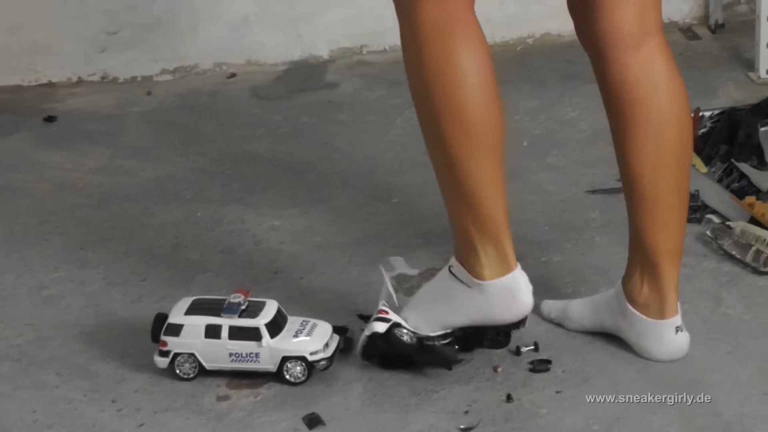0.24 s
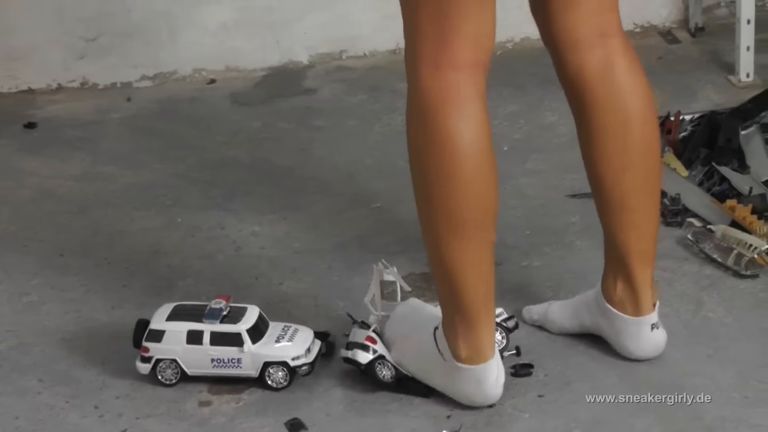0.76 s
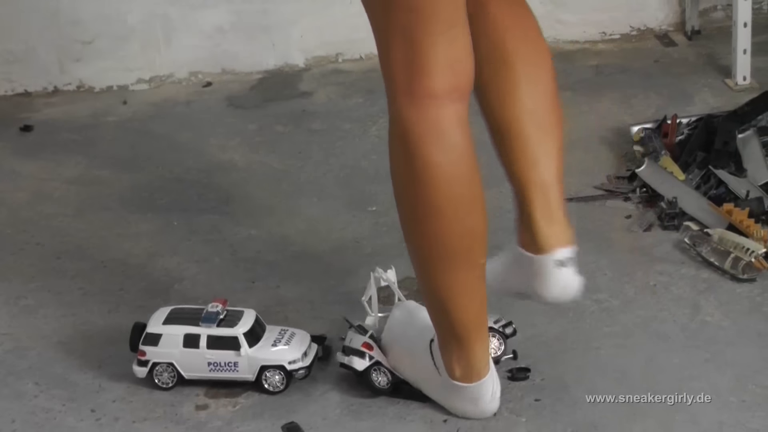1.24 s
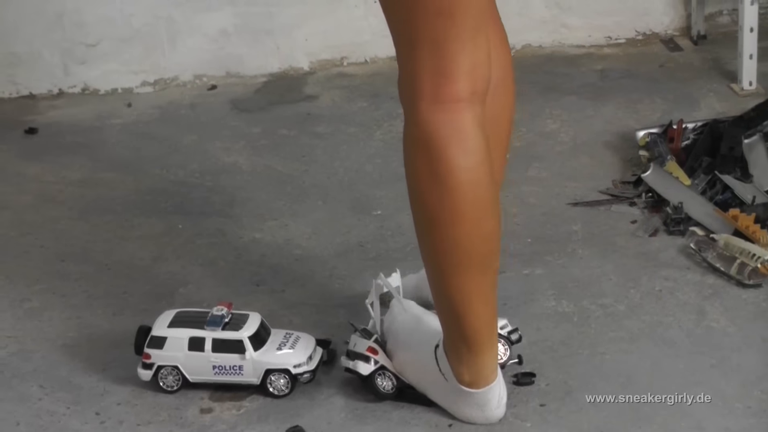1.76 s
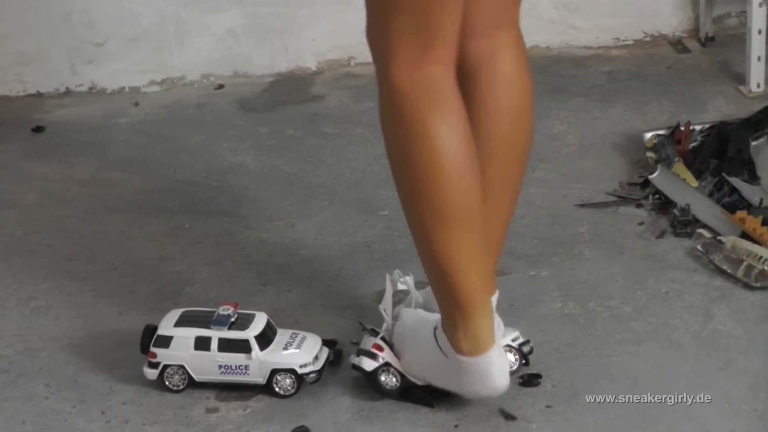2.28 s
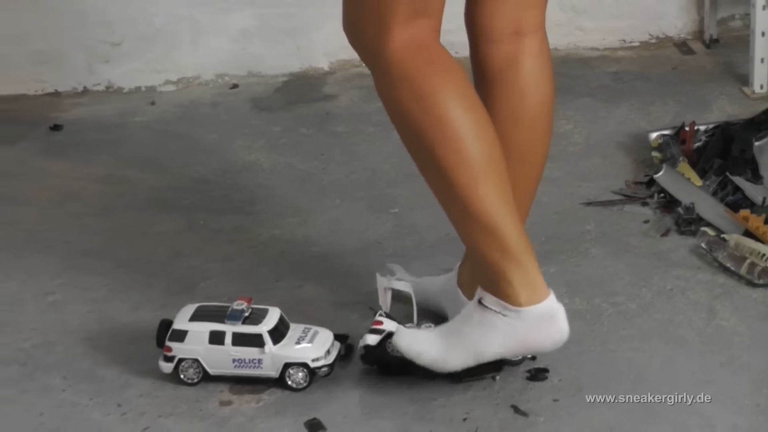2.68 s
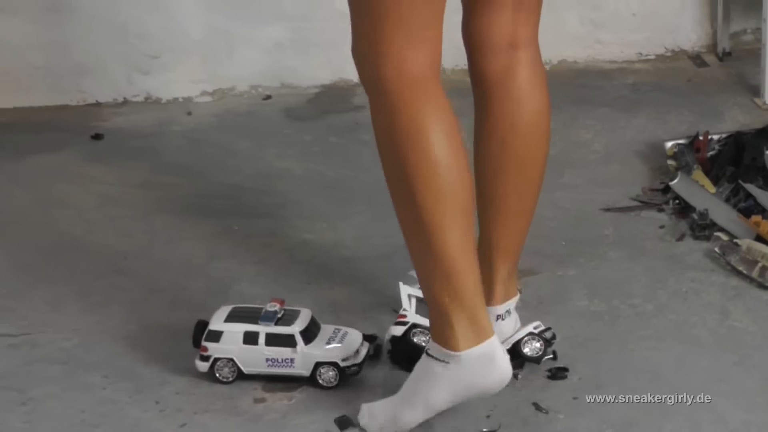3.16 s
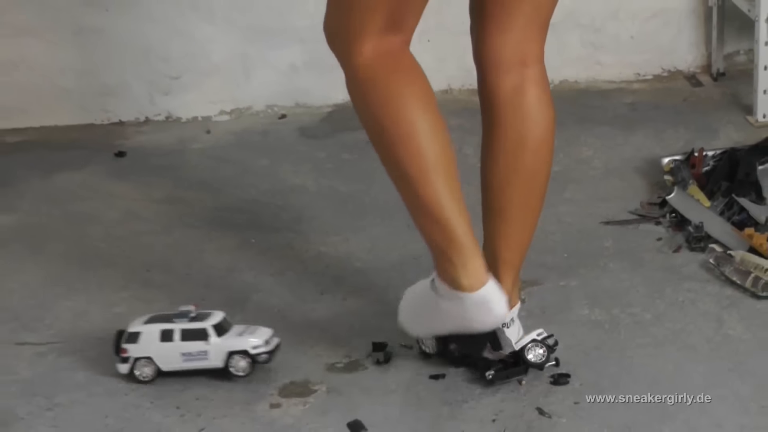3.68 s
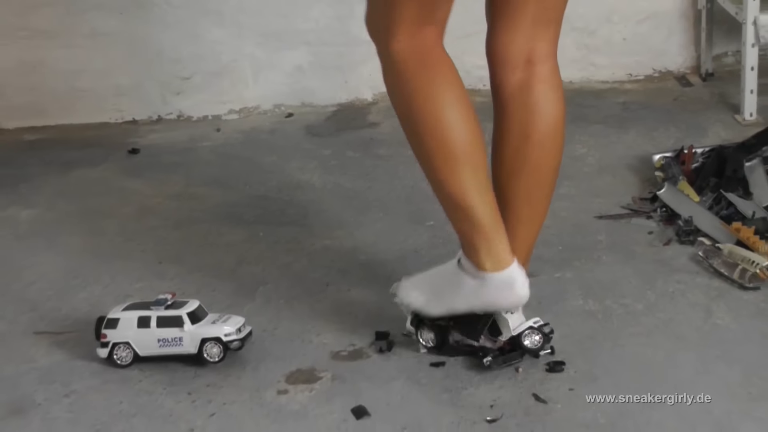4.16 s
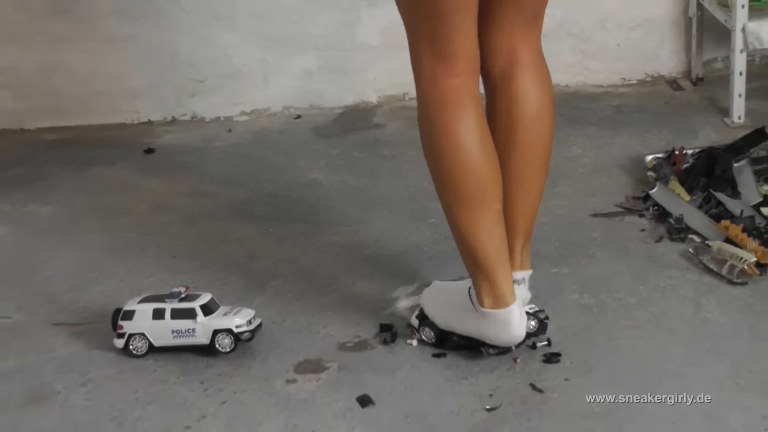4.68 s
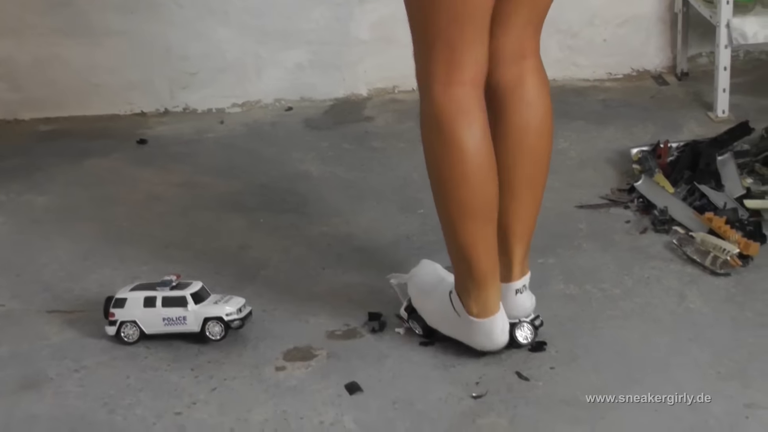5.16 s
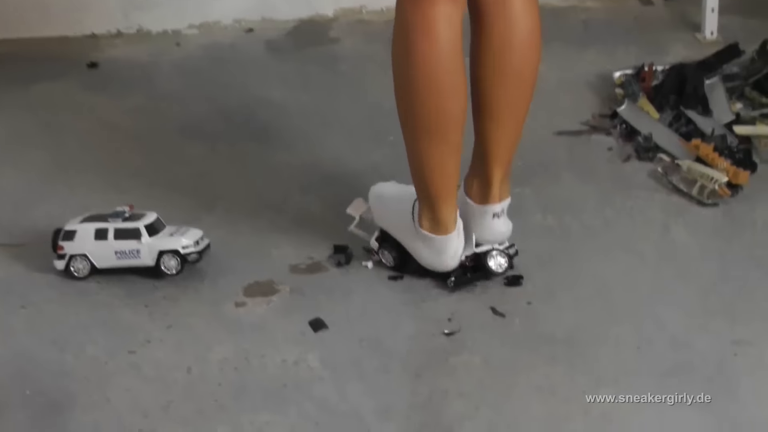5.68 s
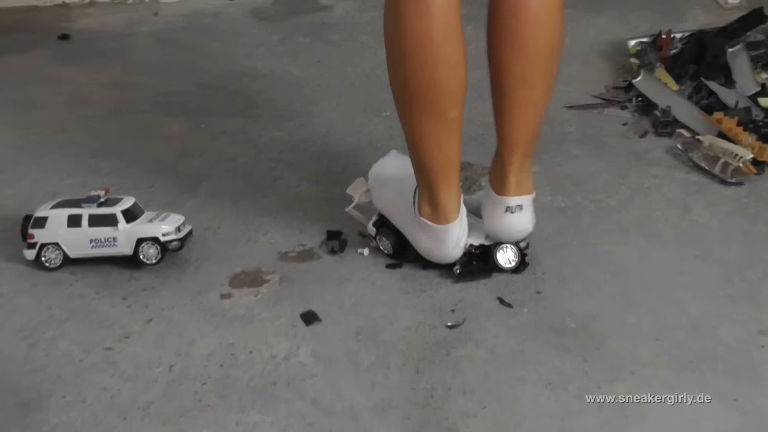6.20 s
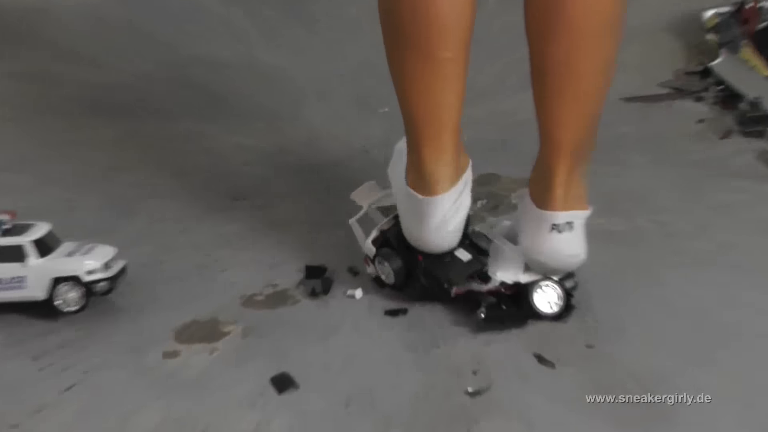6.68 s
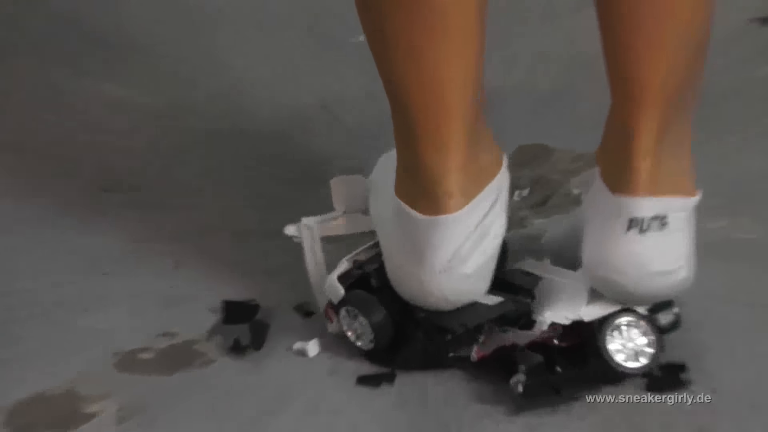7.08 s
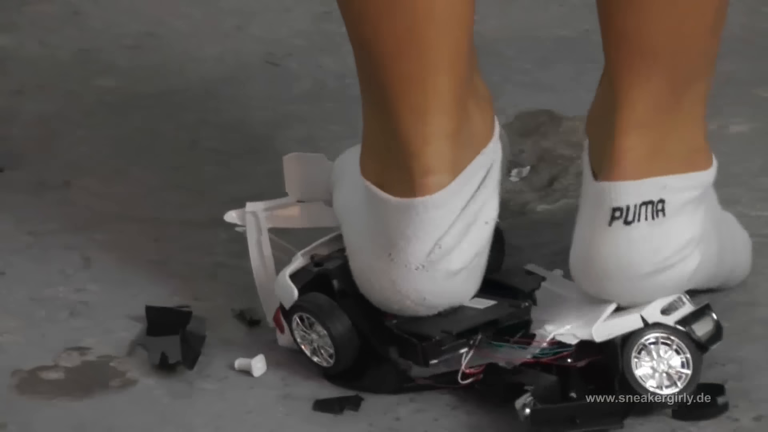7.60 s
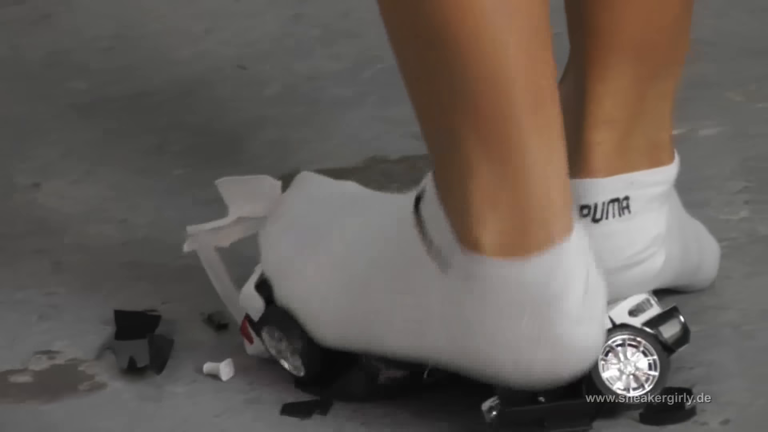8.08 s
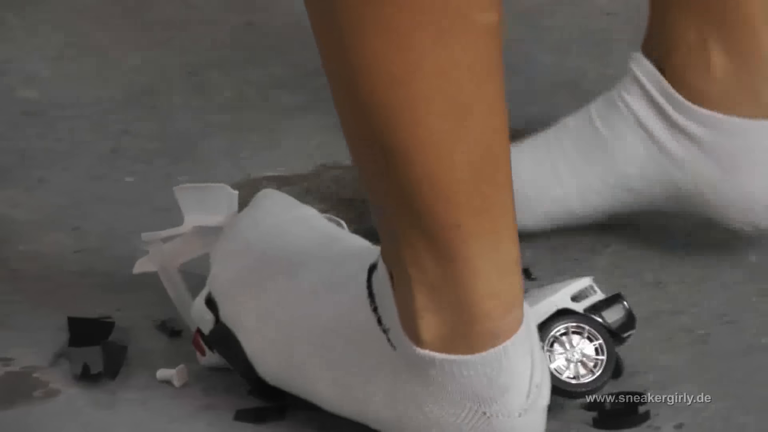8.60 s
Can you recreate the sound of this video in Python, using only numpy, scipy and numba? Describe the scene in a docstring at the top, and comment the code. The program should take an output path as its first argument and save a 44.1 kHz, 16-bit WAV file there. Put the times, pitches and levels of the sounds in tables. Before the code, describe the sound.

Dense brittle cracking and splintering of a plastic toy under socked feet, with short lulls, echoing off hard walls over a faint far hum.

```python
"""A hard plastic snap comes at once: feet in socks grind a plastic toy car on a bare concrete floor.
Bursts of noise ring as shell, panels and edges; splinters tick, small pieces crackle and slips make the shell creak.
A hard-walled room rings on after every snap and a machine hums far off, as wavering sines over soft noise.
Two close microphone ports pick it up, and the camera's gain control ducks when it is loud."""
import sys
import numpy as np
from scipy import signal
from scipy.fft import rfft, irfft, next_fast_len
from scipy.io import wavfile
from scipy.ndimage import uniform_filter1d, map_coordinates
from numba import njit

SR = 44100
rng = np.random.default_rng(int(sys.argv[2]) if len(sys.argv) > 2 else 0)


def put_to_file(sound):
    """Save the sound as 16-bit audio at rate SR, in the file named by the first command-line argument."""
    columns = np.atleast_2d(sound).T  # one column per channel
    safe = np.clip(columns, -1, 1)
    whole_steps = np.round(safe * 32767)
    wavfile.write(sys.argv[1], SR, whole_steps.astype(np.int16))


def attenuation_scalar(level_db):
    """Turn a level in dB into a linear amplitude multiplier (20 dB per decade)."""
    decades = np.asarray(level_db, float) / 20
    return 10 ** decades


N = 389844  # samples
SECONDS = np.arange(N) / SR


def unit(x):
    """Scaled to rms 1 along the last axis."""
    return x / np.sqrt(np.mean(x ** 2, -1, keepdims=True) + 1e-20)


def over_time(points):
    """(t/s, value) points read at every sample."""
    return np.interp(SECONDS, *np.transpose(points))


def along(points, hz):
    """(f/Hz, value) points read on a log axis."""
    f, v = np.transpose(points)
    return np.interp(np.log(hz + 1), np.log(f + 1), v)


def filtered(x, response):
    """x times a complex response of frequency."""
    n = x.shape[-1]
    m = 2 * next_fast_len(n // 2 + min(n, 2048))
    return irfft(rfft(x, m) * response(np.fft.rfftfreq(m, 1 / SR)), m)[..., :n]


def causal(spectrum):
    """Minimum-phase response with the given colour, so that nothing precedes a blow."""
    def response(hz):
        cepstrum = irfft(np.log(attenuation_scalar(along(spectrum, hz)) + 1e-6))
        cepstrum[1:len(hz) - 1] *= 2
        cepstrum[len(hz):] = 0
        return np.exp(rfft(cepstrum))
    return response


def resonance(centre_hz, width_hz):
    """A broad, steep-sided hump: one damped mode applied twice."""
    def response(f):
        damping = 1j * f * width_hz
        return (damping / (centre_hz ** 2 - f * f + damping)) ** 2
    return response


def placed(times, sounds):
    """Sum of short sounds, one row each, started at the given times."""
    at = np.round(np.asarray(times) * SR).astype(int)[:, None] + np.arange(sounds.shape[1])
    return np.bincount(at.ravel(), sounds.ravel(), N + SR)[:N]


def volleys(count, size, t60, flat):
    """Cracks that run as dying ticks; flat evens out their spectra towards a white click."""
    t = np.arange(size) / SR
    fall = attenuation_scalar(-60 * t / t60)
    z = rfft(rng.standard_normal((count, size)) ** 3 * fall)
    evened = irfft(z / np.abs(z) ** flat, size)
    head = 1 + attenuation_scalar(7) * np.exp(-t / 0.003)  # a sharp opening burst that sinks in 3 ms
    rise = 1 - np.exp(-(t + 1 / SR) / 0.0015)  # the crack takes a moment to run
    return evened * np.sqrt(fall) * head * rise


# colour of breaking plastic: f/Hz, relative level/dB per Hz
PLASTIC_COLOUR = [(150, -8.5), (370, -20.5), (520, -14.5), (708, -4), (877, -3.5), (1480, 3.5), (2020, 2),
                  (2860, 3), (3980, -3.5), (6600, -6), (8660, -7.5), (13000, -18), (15500, -103)]


def plastic(cracks):
    """Gives raw cracks the spectrum of breaking plastic."""
    return filtered(cracks, causal(PLASTIC_COLOUR))


# far machine's tones: f/Hz, mean-square level/dB before the waver
HUM_TONES = [(96.9, -99), (242.2, -88.5)]
# colour of the soft room noise: f/Hz, relative level/dB per Hz
AIR_COLOUR = [(30, -66), (160, -29), (260, -19), (821, -20), (1260, 4.5), (6740, -7.5), (12000, -17),
              (15600, -67)]


def background():
    """Slightly wavering hum tones of the far machine over soft room noise (centre, sides)."""
    drift = np.cumsum(rng.standard_normal((len(HUM_TONES), N)), 1) * 0.0055  # radians
    hum = 0
    for (hz, db), phase in zip(HUM_TONES, drift):
        hum = hum + np.sqrt(2) * attenuation_scalar(db) * np.sin(2 * np.pi * hz * SECONDS + phase)
    waver_rate, waver_db = 2.7, 2  # random levels a second, their spread
    knots = rng.standard_normal(int(N / SR * waver_rate) + 4)
    hum = hum * attenuation_scalar(waver_db * map_coordinates(knots, [SECONDS * waver_rate]))
    air = unit(filtered(rng.standard_normal((2, N)), lambda hz: attenuation_scalar(along(AIR_COLOUR, hz))))
    return hum + attenuation_scalar(-51) * air[0], attenuation_scalar(-58) * air[1]


# decay of the hard-walled room: f/Hz, t60/s
ROOM_DECAY = [(200, 0.81), (530, 0.49), (1400, 0.37), (3700, 0.38), (10000, 0.26)]


def room(x):
    """Two diffuse tails (centre, sides); the pieces shift, so every tenth of a second meets new echoes."""
    hop = 4096
    blocks = np.pad(x, (0, -N % hop)).reshape(-1, hop)
    noise = rng.standard_normal((2, len(blocks), SR // 2))
    hz, t, z = signal.stft(noise, SR, nperseg=256)
    decay = attenuation_scalar(-60 * t / along(ROOM_DECAY, hz)[:, None])
    tails = signal.istft(z * decay, SR, nperseg=256)[1]
    # echoes build up over 7.1 ms as the near walls answer
    tails *= np.clip(np.arange(tails.shape[-1]) / SR / 0.0071, 0, 1)
    tails /= np.linalg.norm(tails, axis=-1, keepdims=True)
    wet = signal.fftconvolve(blocks[None], tails, axes=2)
    return [placed(np.arange(len(blocks)) * hop / SR, w) for w in wet]


# low thumps at some of the hardest breaks: t/s, relative level/dB
THUD_EVENTS = [(0.214, -31.5), (1.122, -42), (2.244, -33), (4.608, -34.5), (4.789, -38), (5.027, -38),
               (5.189, -33), (5.775, -33.5), (7.853, -40)]


def thuds():
    """A short low thump, with no ring, about 6 ms after each listed time."""
    s, db = np.transpose(THUD_EVENTS)
    u = np.arange(1024) / SR / 0.00031
    return placed(s + 0.00586, attenuation_scalar(db)[:, None] * u * (2 - u) * np.exp(-u))


# thick, middling and thin pieces: centre f/Hz, width of each pass/Hz, gain/dB, share of the thin-over-thick dB
PIECE_KINDS = [(1100, 1120, 2, 0), (2850, 590, -4.5, -0.5), (5600, 5300, 6, 1)]
# how far thin pieces outweigh thick ones, before each kind's share: t/s, level/dB
THIN_OVER_THICK = [(0, -6.5), (1.4, 6), (2.2, -5), (2.62, 3), (2.95, -2), (6.7, -0.5), (8.2, -7)]
# weight that grinds the wreck between the snaps: t/s, relative crackle level/dB
GRIND_WEIGHT = [(0, -42), (.2, -48), (.42, -39.5), (.85, -44.5), (1.3, -58), (1.43, -49), (2.06, -60),
                (2.2, -31.5), (2.47, -30), (2.58, -22.5), (2.78, -51.5), (2.95, -38), (3.5, -76.5),
                (3.579, -35.5), (4.0, -28), (4.4, -40), (4.78, -26), (5.0, -35.5), (5.33, -36), (5.58, -36),
                (5.66, -29.5), (6.4, -54.5), (6.7, -31.5), (7.0, -46.5), (7.22, -22), (7.4, -49),
                (7.8, -34), (8.2, -28.5), (8.84, -57)]


def grind():
    """Thousands of small pieces give way at random, in fits; a few are much louder than the rest."""
    count, fit_rate, fit_db, scatter = 1100, 18, 1.5, .17  # per kind; fits a second; spread; pitch share
    total = 0
    for centre_hz, width_hz, gain_db, thin_share in PIECE_KINDS:
        when, size = rng.random((count, 2)).T
        when = when * N / SR
        fits = fit_db * rng.standard_normal(int(N / SR * fit_rate) + 1)
        piece_db = fits[(when * fit_rate).astype(int)] - 3 * np.log(size + .06)
        grains = volleys(count, size=256, t60=.012, flat=.5) * attenuation_scalar(piece_db)[:, None]
        stray = np.clip(rng.standard_normal((count, 1)), -1, 2)
        pitch_hz = centre_hz * np.exp(scatter * stray)
        ring = filtered(plastic(grains), resonance(pitch_hz, width_hz))
        level = attenuation_scalar(gain_db + thin_share * over_time(THIN_OVER_THICK))
        total = total + level * unit(placed(when, ring))
    return attenuation_scalar(over_time(GRIND_WEIGHT)) * total


# groans of the bending shell: t/s, length/s, relative level/dB, centre f/Hz
CREAK_EVENTS = [(1.845, 0.056, -52, 1290), (2.166, 0.053, -41.5, 860), (3.537, 0.12, -41, 870),
                (3.644, 0.066, -27, 910), (5.499, 0.07, -41, 1370), (6.179, 0.036, -22, 1380),
                (7.201, 0.13, -30.5, 1190), (8.298, 0.044, -31, 1350)]


def creaks():
    """Uneven slips ring the bent shell in a narrow band, fading in and out."""
    slip_rate, width_hz, scatter, edge_s = 240, 200, 0.13, 0.0045  # mean slips a second; pitch share; fade
    total = 0
    for s, length, db, hz in CREAK_EVENTS:
        when, size, stray = rng.random((40, 3)).T
        at = np.cumsum((.5 + when) / slip_rate)
        fade = np.clip(np.minimum(at, length - at) / edge_s, 0, 1)
        level = 2 * fade * attenuation_scalar(db - 10 * size)
        pitch_hz = hz * (1 + scatter * (2 * stray[:, None] - 1))
        clicks = np.eye(1, 512).repeat(len(at), 0)
        slips = filtered(clicks, resonance(pitch_hz, width_hz))
        total = total + placed(s + at, level[:, None] * unit(slips))
    return total


# splinters: t/s, level/dB rms of each crack
SPLINTERS = [(2.356, -30), (2.370, -20), (2.390, -24), (2.505, -16), (2.827, -32.5), (3.278, -41),
             (4.546, -11), (4.76, -19), (4.783, -20), (5.222, -19), (5.903, -31), (6.029, -18),
             (6.107, -24.5), (6.269, -13.5), (7.196, -25), (7.22, -29), (7.886, -24), (8.25, -28.5),
             (8.447, -15)]


def ticks():
    """Splinters fly off with one short crack each, every one at a pitch of its own."""
    s, db = np.transpose(SPLINTERS)
    centre_hz = 5350 * np.exp(.17 * rng.standard_normal((len(s), 1)))
    cracks = volleys(count=len(s), size=512, t60=0.022, flat=0.23)
    ring = filtered(cracks, resonance(centre_hz, width_hz=5400))
    return placed(s, attenuation_scalar(db)[:, None] * unit(ring))


# breaks: t/s, then hollow shell, panel and brittle edge level/dB before each part's gain
BREAKS = [(.002, -28, -28, -25), (.215, -25, -22.5, -22), (.324, -27, -30, -29), (.553, -35.5, -33, -41),
          (.571, -28.5, -27.5, -31.5), (0.645, -38, -29, -31.5), (.672, -29, -21.5, -27.5),
          (.731, -30, -24.5, -29), (.893, -42, -26.5, -40), (.915, -35.5, -25.5, -38.5),
          (1.121, -38, -57, -21.5), (1.204, -46, -37, -33.5), (1.633, -34, -25, -35),
          (1.809, -55, -48, -47.5), (2.037, -46, -49, -47.5), (2.118, -33, -35, -42),
          (2.234, -24, -26, -22), (2.343, -29, -22, -34), (2.491, -35, -23.5, -28.5),
          (2.542, -29, -28.5, -24.5), (2.873, -34.5, -45, -41.5), (3.042, -31, -30, -25.5),
          (3.062, -44, -39, -26.5), (3.301, -28.5, -30.5, -33.5), (3.525, -31, -32, -36.5),
          (3.645, -17, -27, -28), (3.725, -21, -21.5, -19), (3.808, -26.5, -29, -24),
          (3.938, -30, -45, -25.5), (4.068, -22.5, -34, -21.5), (4.11, -33, -33, -24.5),
          (4.238, -28.5, -29.5, -29.5), (4.404, -33, -29.5, -34), (4.531, -23, -55, -27),
          (4.611, -32, -23, -24), (4.669, -24.5, -28, -26.5), (4.738, -33, -35, -28.5),
          (4.791, -34, -26, -19.5), (4.944, -46, -30, -30.5), (5.031, -25.5, -28.5, -24),
          (5.128, -36, -30, -24.5), (5.193, -17, -35, -16), (5.376, -35, -26, -35),
          (5.654, -27.5, -26.5, -35), (5.728, -28.5, -27.5, -28.5), (5.775, -20.5, -26, -19.5),
          (6.011, -22.5, -20.5, -23.5), (6.103, -30, -33, -26.5), (6.18, -20, -25, -23),
          (6.298, -23, -29, -25), (6.572, -34.5, -29.5, -30), (6.668, -27.5, -31, -33.5),
          (6.739, -56, -34, -46), (6.893, -28.5, -29.5, -35), (7.036, -38.5, -31.5, -42),
          (7.061, -28.5, -23.5, -25), (7.162, -25, -26, -28), (7.183, -20.5, -12, -28),
          (7.282, -26.5, -18.5, -30), (7.494, -41, -40, -42), (7.573, -26, -23, -29.5),
          (7.693, -32, -29, -26), (7.845, -27, -21, -41), (7.86, -22.5, -14.5, -26.5),
          (7.914, -23, -23, -27.5), (8.062, -40, -39, -28), (8.301, -21.5, -31, -33.5),
          (8.398, -15, -13, -21.5), (8.422, -23, -19, -25.5), (8.624, -28, -22, -42)]
# ring of shell, panel and edge: width of each pass/Hz, gain/dB, t60/s of the raw ticks
PART_RINGS = [(856, 4, 0.05), (1410, 4, 0.021), (4670, 8, 0.065)]
# the shell's pitch as the wreck folds flatter: t/s, f/Hz
SHELL_PITCH = [(0, 1124), (2.2, 1060), (7.2, 954), (8.84, 1510)]


def snaps():
    """Each break cracks the three parts at its own strengths; the shell's pitch changes as it folds."""
    s, *parts_db = np.transpose(BREAKS)
    shell, panel, edge = np.exp(0.13 * rng.standard_normal((3, len(s), 1)))  # how each pitch strays
    shell_hz = np.interp(s, *np.transpose(SHELL_PITCH))[:, None] * shell
    centres_hz = [shell_hz, 2960 * np.sqrt(panel), 5850 * edge]
    total = 0
    for centre_hz, (width_hz, gain_db, t60), db in zip(centres_hz, PART_RINGS, parts_db):
        cracks = plastic(volleys(count=len(s), size=1024, t60=t60, flat=.75))
        ring = filtered(cracks, resonance(centre_hz, width_hz))
        total = total + attenuation_scalar(db + gain_db)[:, None] * unit(ring)
    return placed(s, total)


# left port against right: f/Hz, left-right level/dB
PORT_TILT = [(60, 1.4), (250, -1.3), (8000, .8)]
# left port against right: f/Hz, lead of the left/radians
PORT_LEAD = [(60, 1.1), (520, .35), (3000, .05)]


def ports(mid):
    """The centre sound reaches two close microphone ports with small differences of level and phase."""
    half = np.array([[.5], [-.5]])
    return filtered(mid, lambda hz: attenuation_scalar(half * along(PORT_TILT, hz)) * np.exp(1j * half * along(PORT_LEAD, hz)))


# gain of the diffuse side sound between the ports: f/Hz, level/dB
SIDE_GAIN = [(60, -10), (240, -20), (950, -6.5), (3770, -12), (15000, -4)]


def diffuse_sides(x):
    """Diffuse sound differs little between close ports, so its sides are turned down by frequency."""
    return filtered(x, lambda hz: attenuation_scalar(along(SIDE_GAIN, hz)))


def scene():
    """Direct and diffuse sound at two close microphone ports."""
    car = snaps() + ticks() + grind() + creaks()
    centre, sides = room(car)
    wall = attenuation_scalar(-8) * np.pad(car, (round(.008 * SR), 0))[:N]  # the wall right behind answers first
    toy = np.array([car + wall + attenuation_scalar(2.5) * centre, sides])
    toy = filtered(toy, lambda hz: 1 / (1 + (410 / (hz + 1)) ** 6))  # small things radiate little bass
    still, still_sides = background()
    pair = ports(toy[0] + thuds() + still)
    sides = diffuse_sides(toy[1]) + still_sides
    return pair + [sides, -sides]


# bass lift, falling as the lens closes in: t/s, level/dB
ZOOM_BASS = [(6.6, 37.5), (7.6, 31.5)]


def zoom(dry):
    """The zooming microphone loses bass, below about 340 Hz, as the lens closes in."""
    bass = filtered(dry, lambda hz: 1 / (1 + (hz / 340) ** 5))
    return dry + (attenuation_scalar(over_time(ZOOM_BASS)) - 1) * bass


@njit
def follow(level, fall):
    """Jumps up with the level, sinks back slowly."""
    out = level.copy()
    for i in range(1, len(out)):
        out[i] = max(out[i], out[i - 1] * fall)
    return out


def top_cut(x):
    """Nothing passes above the cut-off."""
    return signal.sosfilt(signal.butter(12, 16300, fs=SR, output="sos"), x)


def record(dry):
    """The zooming microphone; gain control that ducks at once and recovers slowly; soft clipping; dull top."""
    heard = zoom(dry)
    loudness = uniform_filter1d(np.abs(heard).max(0), size=256)
    level = follow(loudness, attenuation_scalar(-14 / SR))  # sinks 14 dB a second
    gain = attenuation_scalar(6.0) * (1 + (level / attenuation_scalar(-29.0)) ** 2) ** -.25
    clipped = np.tanh(0.7 * heard * gain) / 1.25
    mix = filtered(clipped, lambda hz: np.where(hz > 11980, attenuation_scalar(-12), 1))  # the recorder keeps little treble
    return top_cut(mix)


dry = scene()
out = record(dry)
put_to_file(out)
```